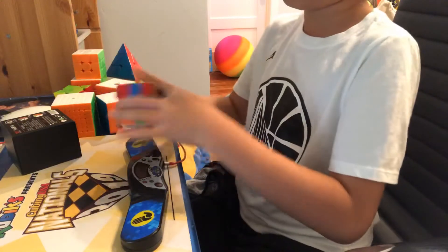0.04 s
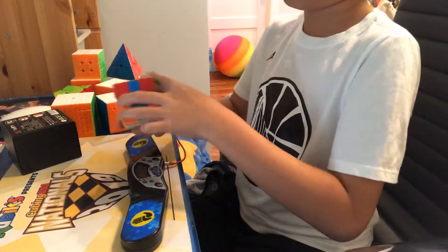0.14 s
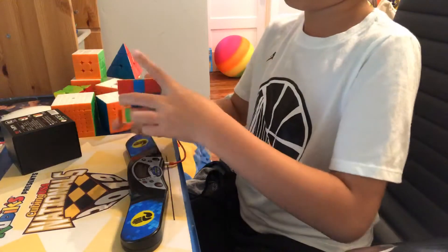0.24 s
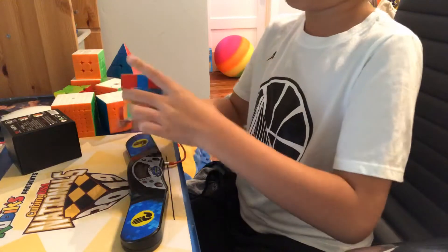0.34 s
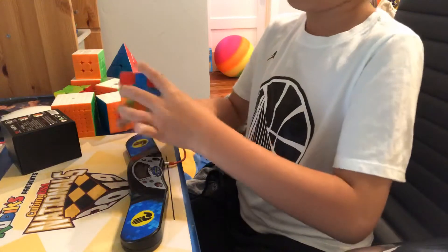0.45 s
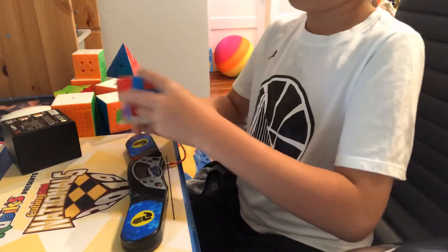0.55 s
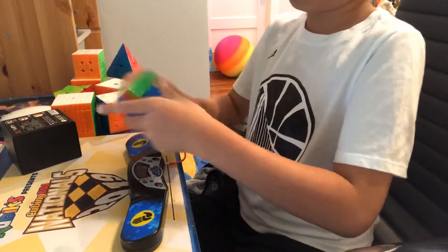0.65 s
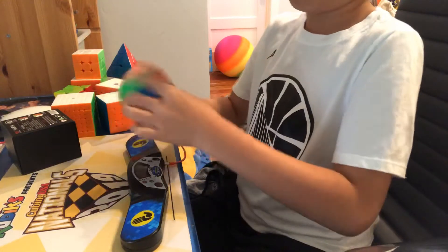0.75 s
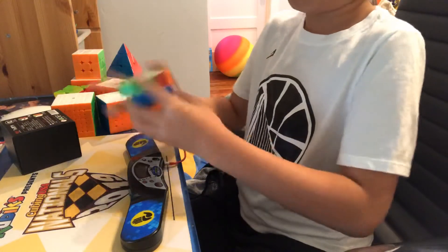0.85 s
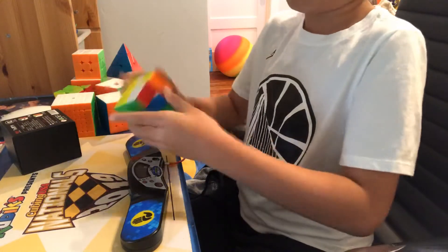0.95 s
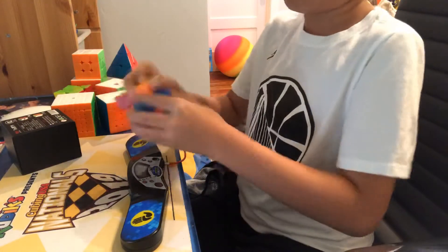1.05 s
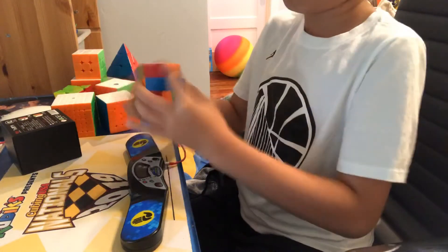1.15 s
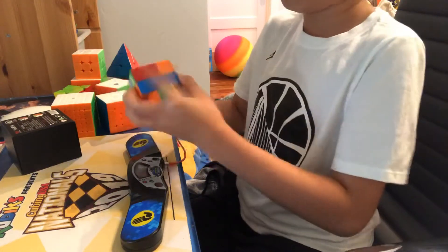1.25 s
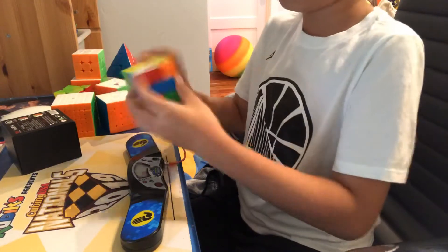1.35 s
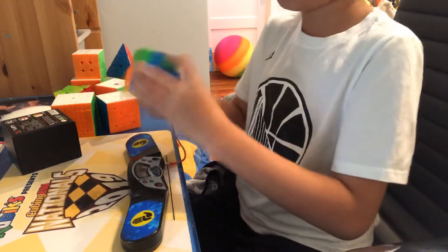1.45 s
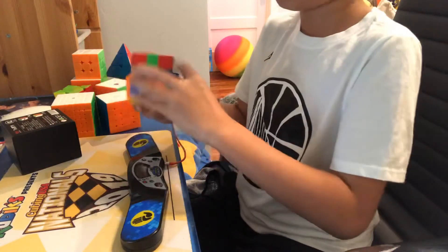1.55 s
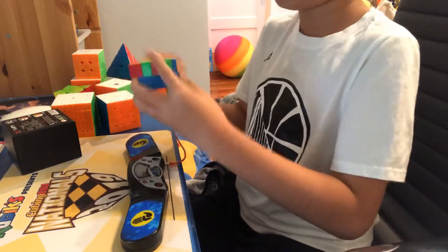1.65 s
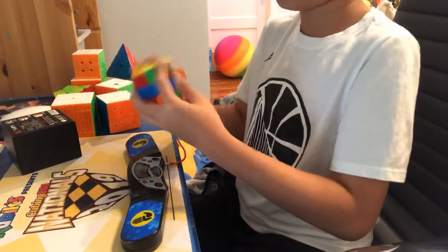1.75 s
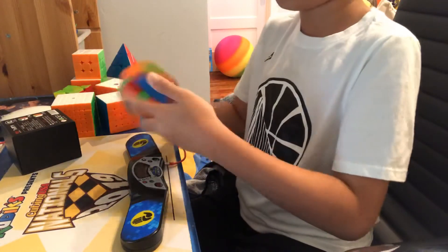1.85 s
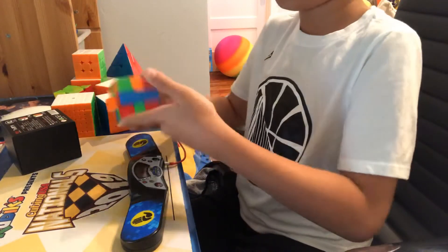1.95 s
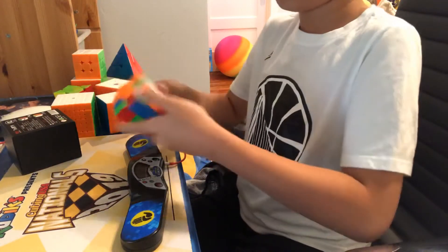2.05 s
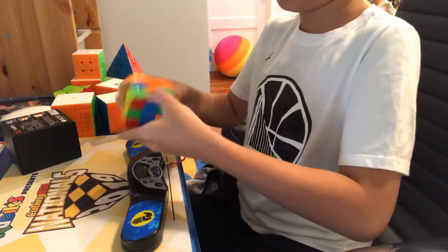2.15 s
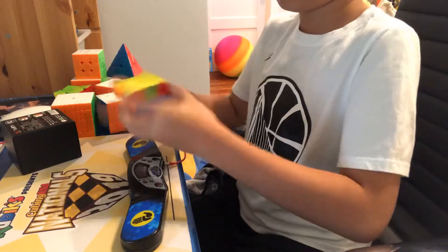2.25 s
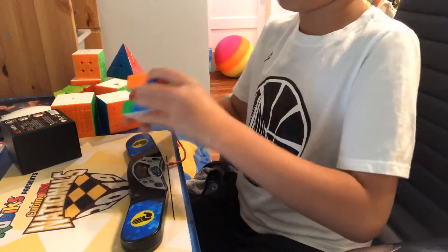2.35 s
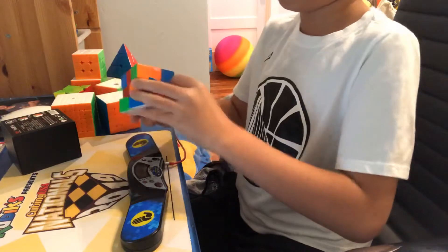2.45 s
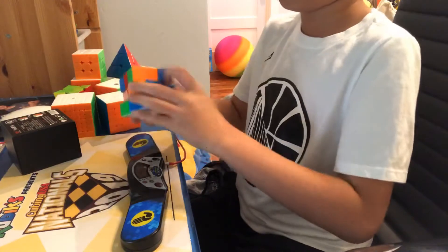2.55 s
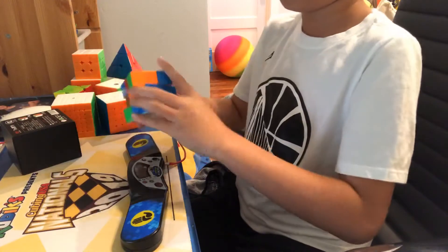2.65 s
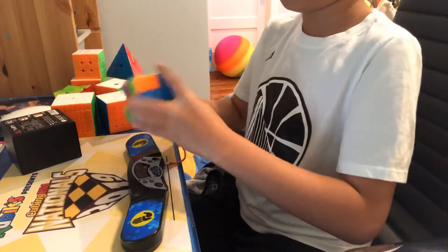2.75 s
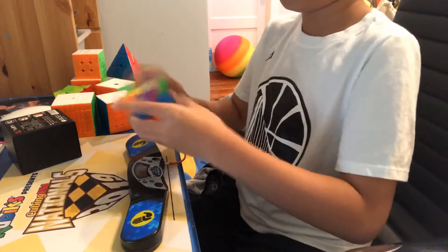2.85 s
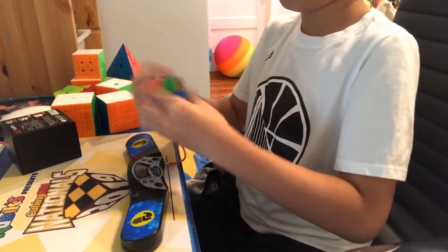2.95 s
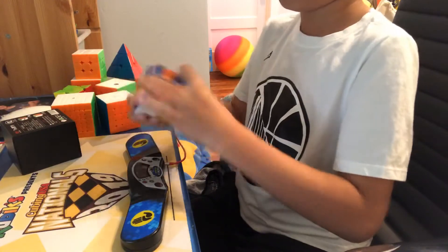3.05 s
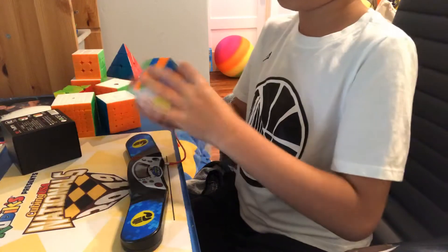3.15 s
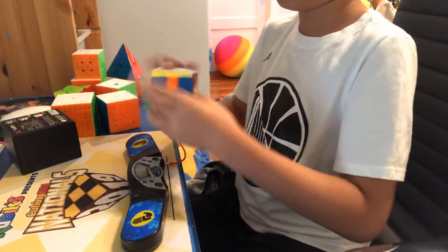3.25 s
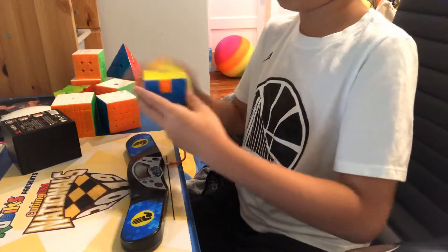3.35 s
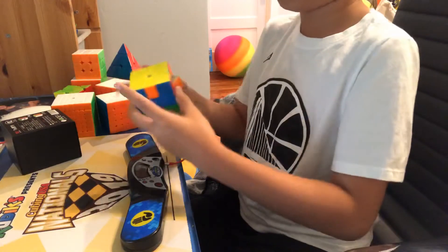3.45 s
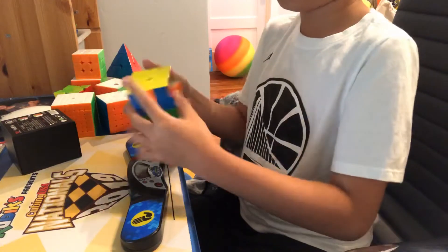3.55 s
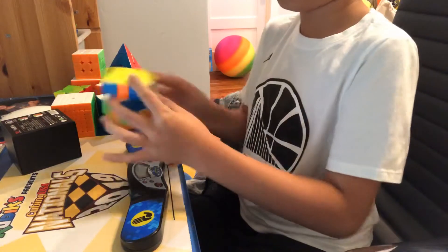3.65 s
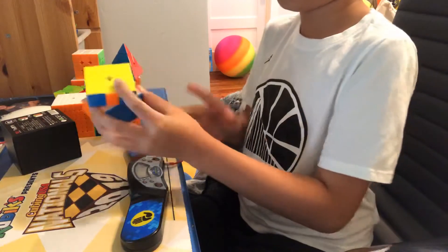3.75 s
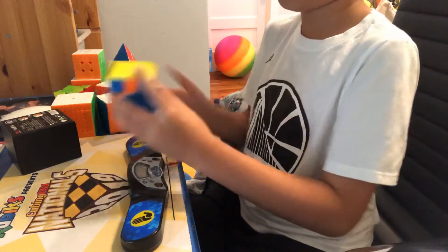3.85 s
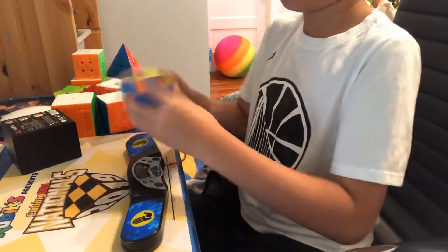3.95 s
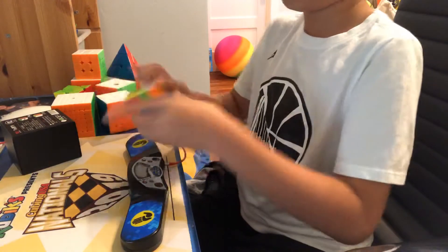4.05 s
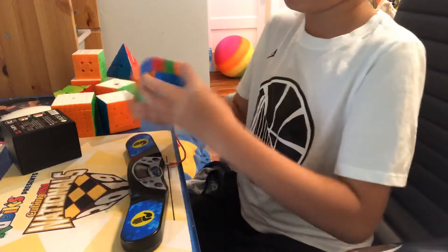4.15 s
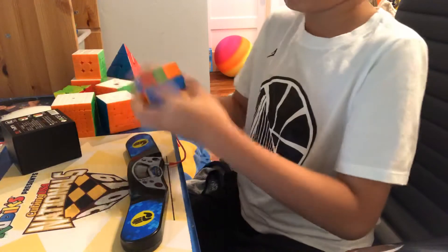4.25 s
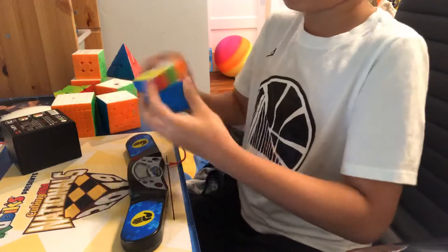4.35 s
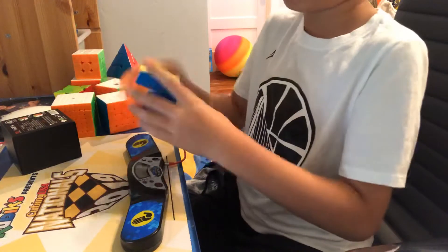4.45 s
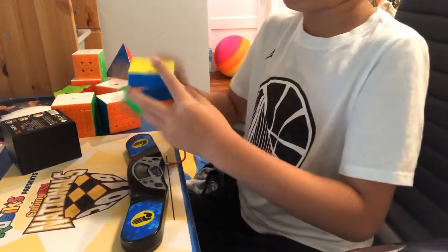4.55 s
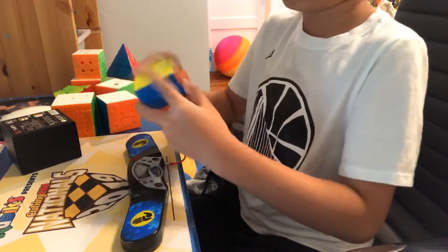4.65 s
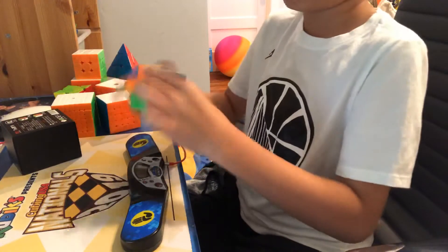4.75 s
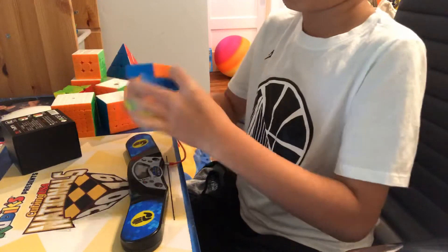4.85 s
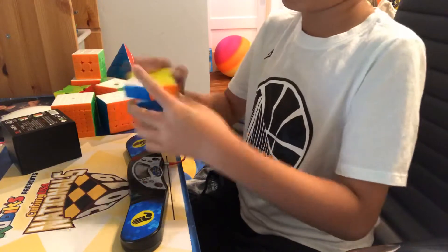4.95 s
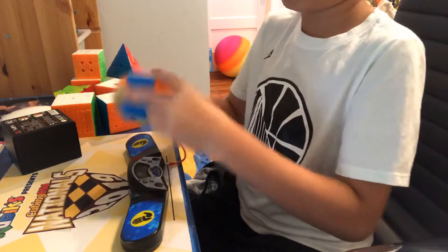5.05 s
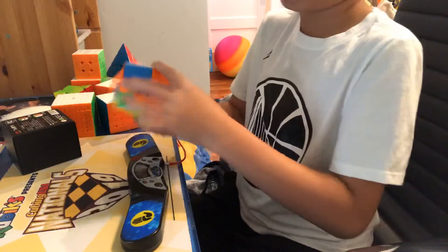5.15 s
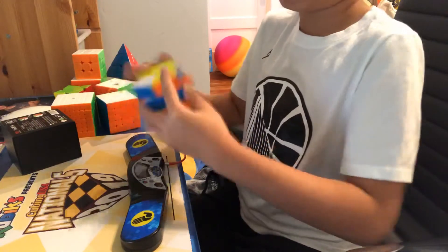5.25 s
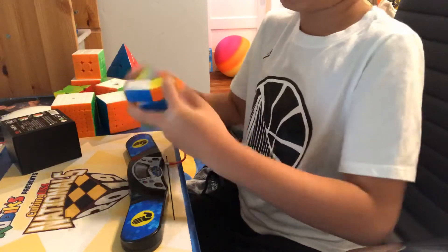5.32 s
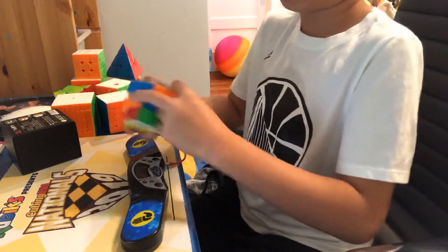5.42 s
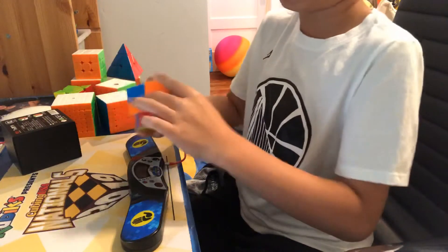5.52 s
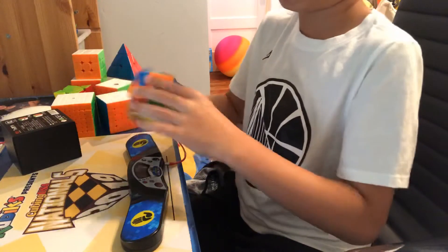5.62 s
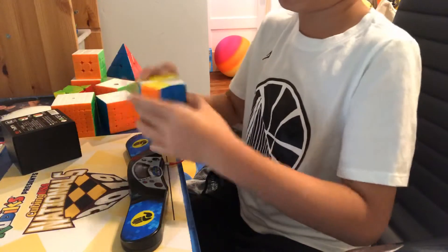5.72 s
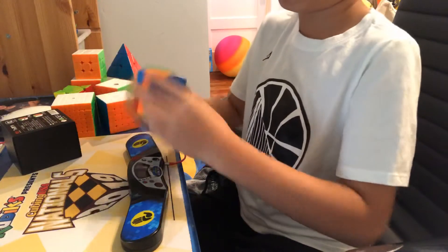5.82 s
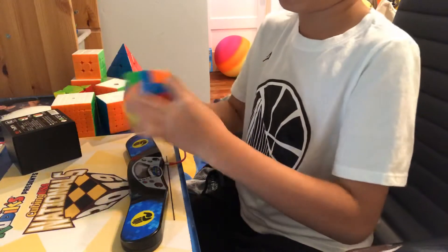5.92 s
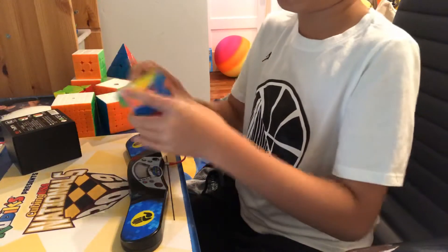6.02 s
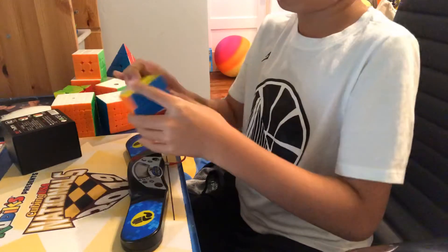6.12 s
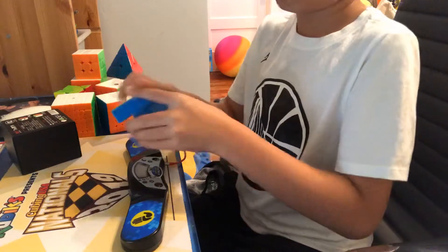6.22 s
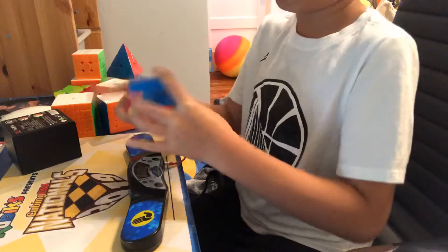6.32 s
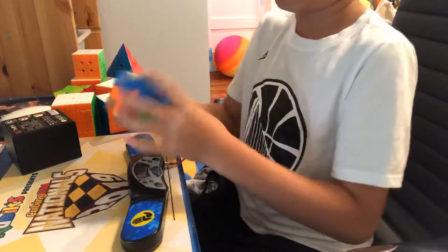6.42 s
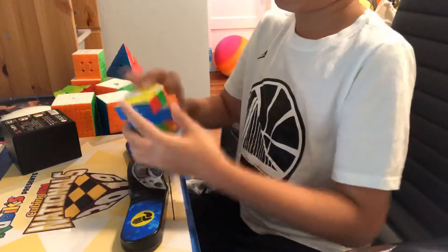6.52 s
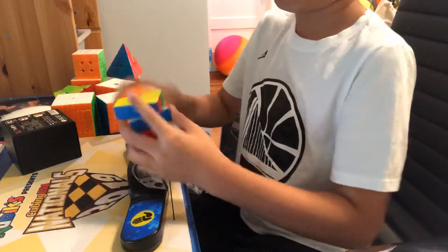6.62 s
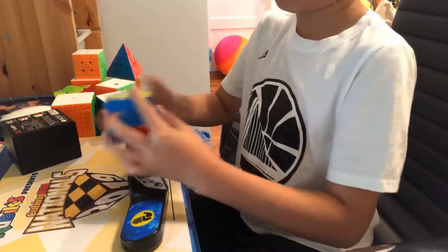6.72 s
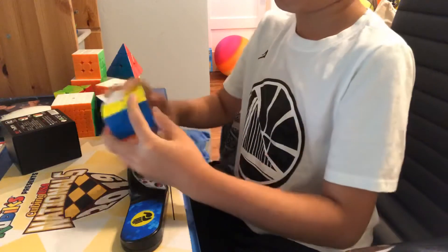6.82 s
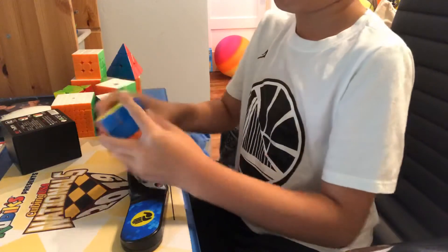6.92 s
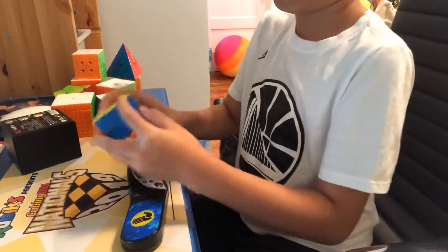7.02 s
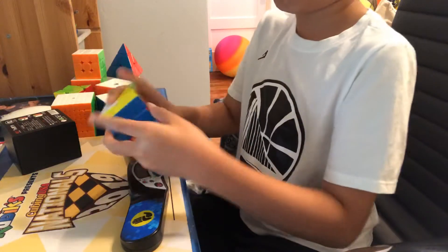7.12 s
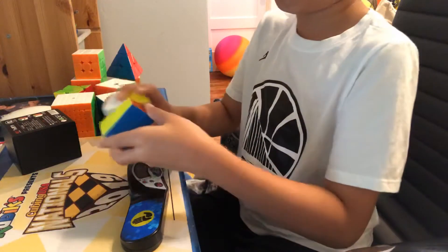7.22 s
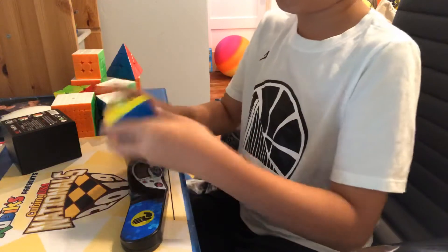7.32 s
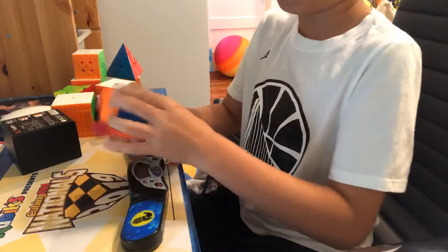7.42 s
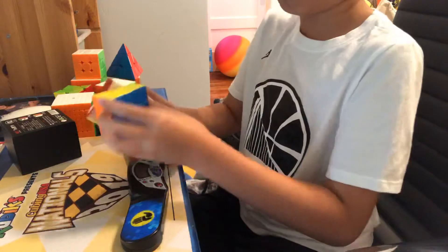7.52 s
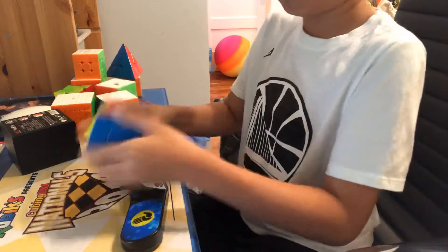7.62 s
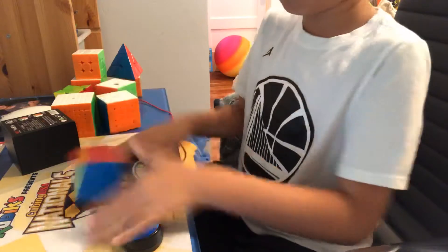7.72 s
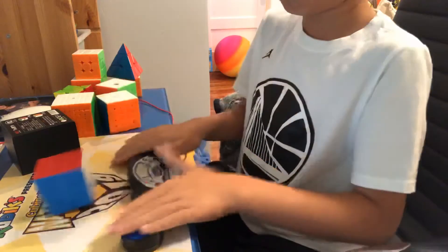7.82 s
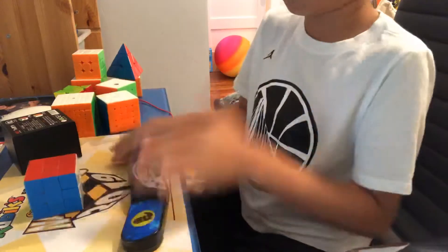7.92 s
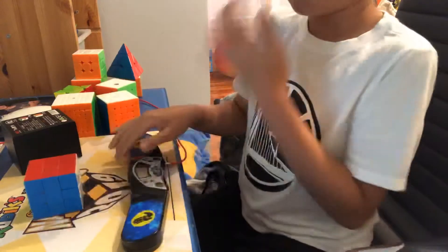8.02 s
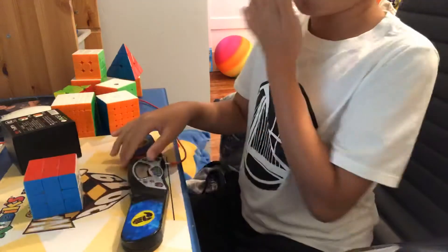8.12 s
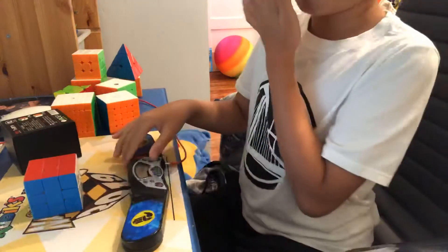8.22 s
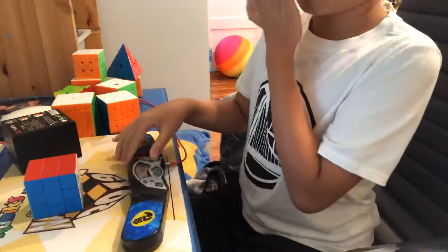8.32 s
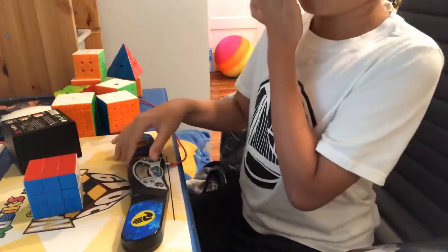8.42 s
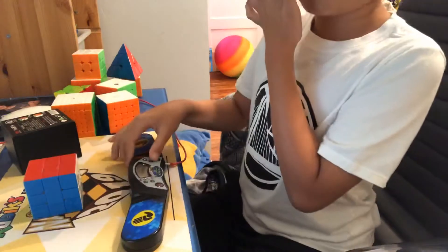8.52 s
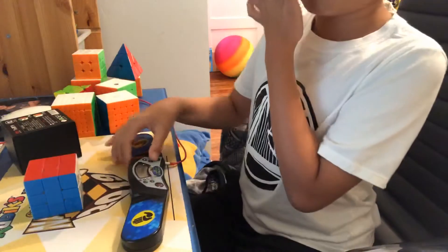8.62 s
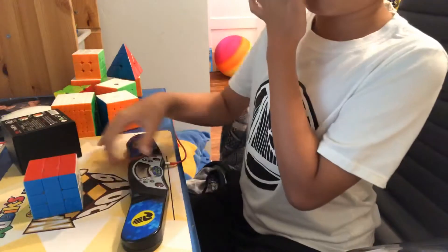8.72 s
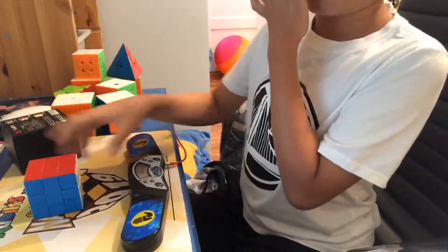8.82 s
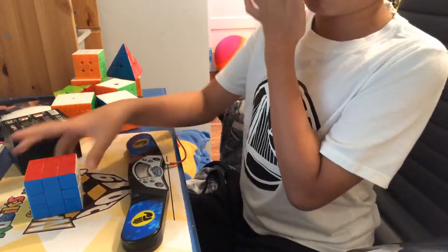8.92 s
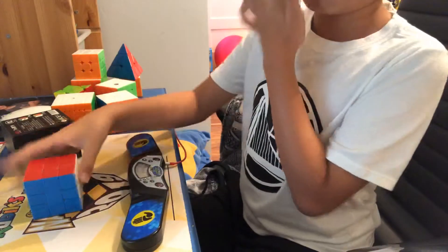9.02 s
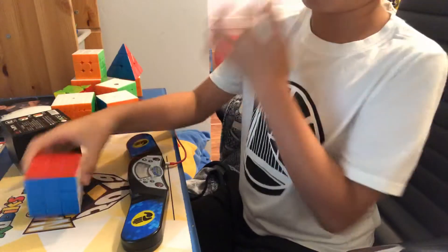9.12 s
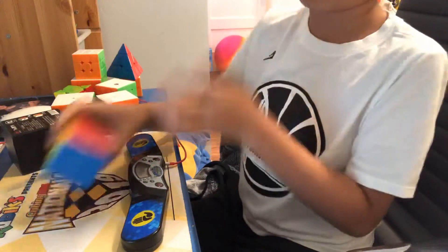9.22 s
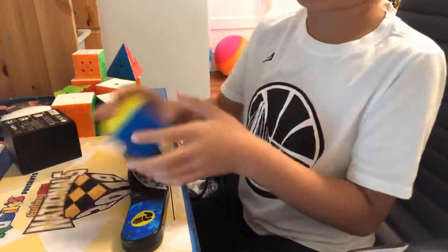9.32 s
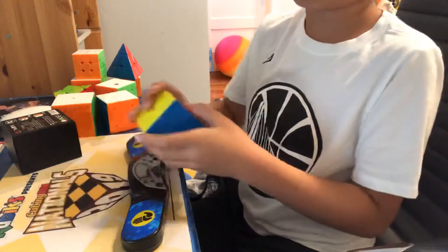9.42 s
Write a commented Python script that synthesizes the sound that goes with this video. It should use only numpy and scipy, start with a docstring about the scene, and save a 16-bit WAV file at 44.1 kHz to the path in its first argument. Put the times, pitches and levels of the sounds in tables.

```python
"""Turning a plastic twisty puzzle

Hands turn the puzzle fast in a small room while a low hum runs on. Each turn ticks and slides, and pieces snap
into place, ringing the plastic and the air in the hollow body. Near the end the puzzle drops on a desk mat and
thumps the desk top, then fingers lightly touch desk and puzzle and press the buttons of a timer."""
import sys
import numpy as np
from scipy import signal
from scipy.fft import rfft, irfft, next_fast_len
from scipy.io import wavfile
from scipy.ndimage import uniform_filter1d

SR = 44100
rng = np.random.default_rng(int(sys.argv[2]) if len(sys.argv) > 2 else 0)


def wav_out(sig):
    """Save sig, one row per channel (or a flat mono array), as 16-bit PCM at SR to the path in sys.argv[1]."""
    wavfile.write(sys.argv[1], SR, np.round(np.clip(np.atleast_2d(sig).T, -1, 1) * 32767).astype(np.int16))


N = 417627

# tone of the room air: (pitch [Hz], level [dB])
AIR_TONE = [(15, -65), (25, -35.5), (52, -13), (76, -8.5), (92, -19.5), (123, -4.5), (170, -23), (212, -19),
            (326, -22.5), (363, -28.5), (476, -25.5), (677, -36.5), (3430, -44), (16000, -54)]
# low hums: (pitch [Hz], width [Hz], level [dB])
HUMS = [(70, 16, -60), (122.3, 19.5, -58.5)]
# modes of the desk top, the notes it rings at: (pitch [Hz], level [dB], time to fade 60 dB [s])
DESK_MODES = [(65.4, -10.5, 0.42), (94.3, -6, 0.13), (147.8, -2.5, 0.12), (213, -9.5, 0.041),
              (322, 0.5, 0.049), (402, 6.5, 0.036), (478, -3.5, 0.11), (546, -17, 0.22), (686, -5, 0.091),
              (784, -11, 0.1), (950, 4.5, 0.017)]
# blows on the desk: (time [s], peak level [dB], contact time [ms])
DESK_BLOWS = [(7.803, -12.5, 1.15), (7.811, -22.5, 5.4), (7.819, -24, 1.4), (7.838, -21, 0.5),
              (7.933, -17, 0.93)]
# light touches and presses of timer buttons: (time [s], level [dB], knock pitch [Hz], knock level over the tick
# [dB])
FINGER_TOUCHES = [(7.933, -23.5, 950, -1), (8.3, -55, 870, -6), (8.5437, -46, 1230, 8.5),
                  (8.6832, -44.5, 1185, 5.5), (8.755, -46, 1350, -15), (8.792, -56.5, 996, 10),
                  (8.8, -62, 896, 14), (9.081, -60, 890, 13), (9.098, -45.5, 1550, -1.5),
                  (9.13, -56, 1144, -15), (9.179, -49.5, 810, -25), (9.197, -51, 810, -2),
                  (9.2058, -55, 790, 12), (9.213, -57, 900, 16), (9.4489, -35.5, 1170, -16)]
# modes of the pieces, damped by the fingers: (pitch [Hz], level [dB], time to fade 60 dB [s])
PIECE_MODES = [(2406, -4, 0.012), (2850, -11.5, 0.0072), (3660, -9, 0.0037), (4270, -0.5, 0.0055),
               (5040, -4.5, 0.0069), (5995, 0.5, 0.0069), (7195, 3.5, 0.0049), (8360, 1.5, 0.0027),
               (9780, -3.5, 0.0071), (11330, -4.5, 0.0071), (12870, -3, 0.0043), (14000, -8.5, 0.0027),
               (15500, -10, .002)]
# tone of sliding plastic: (pitch [Hz], level [dB])
SLIDE_TONE = [(290, -49.5), (500, -20), (906, -15), (1130, -6), (1620, 2), (1980, -10), (2290, -6),
              (7530, -9), (8450, -11.5), (12700, -18.5), (16000, -32.5)]
# flurries of turning between pauses: (start [s], length [s], level [dB])
TURN_FLURRIES = [(0.0, .11, -46), (0.264, .05, -52), (0.542, .34, -47), (1.0, .13, -49.5),
                 (1.153, .45, -43), (1.672, .16, -49.5), (2.02, .26, -73.5), (2.323, .07, -68),
                 (2.45, .05, -53), (2.76, .04, -56), (2.842, .11, -42), (3.032, .41, -44),
                 (3.54, .02, -55.5), (3.63, .14, -47), (4.012, .49, -45.5), (4.578, .08, -47),
                 (4.748, .17, -42.5), (4.998, .41, -42), (5.454, .12, -50), (5.778, .35, -41.5),
                 (6.196, .1, -56.5), (6.369, .31, -45), (6.753, .17, -47), (7.033, .08, -59),
                 (7.241, .06, -53.5), (7.35, .04, -62), (7.412, .15, -50), (7.646, .08, -42.5),
                 (7.802, .06, -57)]
# usual notes of the hollow body: (pitch [Hz])
HOLLOW_PITCHES = [1380, 1622, 1640, 1688, 1740]
# pieces snapping home, and near 7.8 s the puzzle clicking as it lands on the desk: (time [s], level [dB],
# hollow pitch [Hz], hollow level over the pieces [dB])
MAIN_SNAPS = [(0.0352, -21.5, 1650, -13.5), (0.0973, -34, 1630, -7), (0.2565, -28, 1610, -2),
              (0.3118, -27, 1430, -4), (0.369, -40.5, 1500, 2.5), (0.5263, -30.5, 1430, -6.5),
              (0.547, -27, 1480, -8), (0.5675, -21.5, 1340, -9), (0.6372, -26.5, 1770, -6.5),
              (0.687, -33, 1650, -3), (0.7111, -23.5, 1360, 0.5), (0.7184, -19, 1450, 2.5),
              (0.746, -22, 1390, 0.0), (0.8037, -29, 1550, 5), (0.8177, -24, 1410, -7),
              (0.8403, -25, 1700, 4.5), (0.856, -25.5, 1770, 1.5), (0.8695, -28.5, 1710, -14),
              (1.0052, -34, 1420, 3), (1.0293, -34.5, 1410, 6), (1.0758, -30.5, 1400, -3),
              (1.1539, -25.5, 1390, -5.5), (1.1837, -21.5, 1760, -3), (1.219, -22, 1620, -10),
              (1.2306, -24.5, 1560, -4.5), (1.2557, -22.5, 2010, -13.5), (1.264, -26.5, 1750, -20),
              (1.3192, -22, 1734, -14), (1.3723, -13, 2325, -7.5), (1.4545, -27, 1655, -1),
              (1.474, -25, 2070, -18), (1.49, -24, 1706, 4.5), (1.526, -17.5, 2090, -8),
              (1.5435, -25, 1760, 3), (1.5919, -30.5, 1760, 0), (1.703, -26, 1650, -8),
              (1.798, -27, 1610, -8), (1.8088, -26.5, 1740, -8), (1.9158, -53.5, 1400, 14.5),
              (2.121, -56.5, 1410, 11), (2.3718, -40, 1600, -5), (2.4421, -28, 1470, 4.5),
              (2.4741, -18.5, 1470, -5.5), (2.635, -54, 1370, 13), (2.7573, -39, 1600, -2.5),
              (2.82, -28.5, 1460, -0.5), (2.897, -21.5, 1614, -14), (2.9206, -23, 1460, -5.5),
              (3.013, -28, 1650, -8), (3.0421, -24.5, 1690, -2.5), (3.0798, -17.5, 1770, -7.5),
              (3.1451, -17, 1810, -15), (3.18, -25.5, 1287, -14), (3.2308, -27.5, 1280, -6),
              (3.2824, -30.5, 1820, 2.5), (3.3118, -12.5, 1700, -12.5), (3.3218, -20, 1640, 1.5),
              (3.3679, -25, 1970, -15), (3.3928, -24, 1740, -4.5), (3.4114, -25, 1860, -7),
              (3.59, -40.5, 1230, -14), (3.6438, -30, 1580, -22), (3.6696, -23, 1680, -6),
              (3.7303, -20.5, 1370, -10), (3.744, -14, 1570, -7), (3.9877, -30.5, 1440, -5),
              (4.0015, -26, 1390, 2.5), (4.011, -28.0, 1700, -1), (4.0774, -22.5, 1750, -10),
              (4.1095, -25, 1414, -2), (4.1743, -45.5, 1680, 12), (4.191, -19, 2066, -9.5),
              (4.2192, -19.5, 1720, -3.5), (4.245, -14.5, 1590, -10), (4.3602, -31.5, 1605, -3.5),
              (4.417, -19.5, 1650, 0.5), (4.491, -30.5, 2180, -3.5), (4.5599, -27.5, 1520, -5.5),
              (4.6183, -21.5, 1380, -9), (4.6344, -15, 1640, -11), (4.7484, -31, 1520, 0),
              (4.7631, -27.5, 1703, -4), (4.8474, -35.5, 1573, 4), (4.8593, -18.5, 1736, -1),
              (4.99, -28.5, 1660, -6.5), (5.01, -29, 1380, -4.5), (5.0331, -23, 1590, -11),
              (5.0401, -12, 1580, -8), (5.054, -16, 1132, -18.5), (5.1012, -31.5, 1584, 6),
              (5.1245, -30, 1590, -0.5), (5.1755, -9.5, 1620, -4), (5.2097, -23, 1406, -14),
              (5.306, -22.5, 1670, -14), (5.3362, -10, 1652, -17), (5.3727, -19.5, 1490, -13),
              (5.386, -24.5, 1870, -9), (5.461, -26.5, 2160, -1.5), (5.4813, -31.5, 1650, 8.5),
              (5.4937, -23.5, 1370, -10.5), (5.5732, -27.5, 1956, -12), (5.65, -48.5, 1580, 1),
              (5.681, -48.5, 1590, -1), (5.7408, -40.5, 1570, 5.5), (5.7544, -32.5, 1640, -4.5),
              (5.7843, -42.5, 1684, 15), (5.791, -35.5, 1640, 1.5), (5.8336, -25.5, 1577, -16),
              (5.8488, -27.5, 1630, -7.5), (5.906, -26, 1620, 1), (5.916, -25, 1680, -3.5),
              (5.9441, -10.5, 1670, -6), (6.0666, -28, 1590, -7), (6.093, -25, 1490, -14),
              (6.11, -28, 1190, -2), (6.132, -35, 1110, 2.5), (6.242, -40.5, 1540, -12.5),
              (6.3447, -45, 1590, 15.5), (6.3657, -30, 1580, -2), (6.4062, -48.5, 1580, 14.5),
              (6.4142, -26.5, 1650, -2.5), (6.4801, -26.5, 1980, -6), (6.4976, -24.5, 1640, -1),
              (6.583, -31.5, 2020, 4.5), (6.613, -14.5, 1620, -5.5), (6.775, -29.5, 1120, 3),
              (6.854, -28, 1640, 0), (6.893, -27.5, 1280, -5), (6.902, -18.5, 1610, -8),
              (7.0255, -30.5, 1710, -8), (7.0343, -25.5, 1583, -2.5), (7.1535, -42.5, 1644, -2.5),
              (7.2731, -32.5, 1664, 0.5), (7.282, -31.5, 1668, -12), (7.4036, -23, 1690, -1),
              (7.414, -23.5, 1600, 0), (7.4688, -34.5, 1610, 7.5), (7.4872, -22.5, 1740, 5.5),
              (7.5255, -20, 1610, -9), (7.5527, -24, 1460, -6.5), (7.6629, -28.5, 1730, 1.5),
              (7.7165, -31.5, 1860, -1), (7.787, -26, 1610, 8), (7.8036, -13.5, 1490, -2.5),
              (7.8105, -22, 1430, 5.5), (7.8188, -24, 1650, 6), (7.8355, -24, 1380, -1.5)]

RING_SAMPLES = 1024
ROOM_FADE_S, ROOM_TREBLE_FADE_S, ROOM_DB = 0.34, 0.16, -6.5  # a fade is a drop of 60 dB
RISE_DB_PER_S, FALL_DB_PER_S = 451, 173.5  # edges of a flurry
RATTLE_DB, RATTLE_S = -25, 0.039  # loose pieces after a snap: relative level, time to fall to 37%
TICKS_PER_S = 180


def gain(db):
    """Turn decibels into a factor to multiply by."""
    return 10 ** (np.asarray(db) / 20)


def set_level(x, db):
    """Scale a sound to an average (rms) level."""
    return x * gain(db) / np.sqrt(np.mean(x ** 2))


def shape_tone(x, points):
    """Filter a sound along a curve of (pitch [Hz], level [dB]) points."""
    hz, db = np.transpose(points)
    size = next_fast_len(len(x))
    bin_hz = np.maximum(np.arange(size // 2 + 1) * SR / size, 1)
    curve = gain(np.interp(np.log(bin_hz), np.log(hz), db))
    return irfft(rfft(x, size) * curve, size)[:len(x)]


def cut_bass(x, hz):
    """An object gives off little sound at pitches too low for its size."""
    return signal.sosfilt(signal.butter(6, hz, "high", fs=SR, output="sos"), x)


def place(times, sounds):
    """Add each sound to a silent track at its time in seconds."""
    track = np.zeros(N + sounds.shape[1])
    for time, sound in zip(times, sounds):
        start = int(time * SR)
        track[start:start + len(sound)] += sound
    return track[:N]


def ring(hz, db, fade_s, size=RING_SAMPLES):
    """A struck object rings as a sum of fading sine waves; one row per hit."""
    t = np.arange(size)[:, None] / SR
    hz, db, fade_s = (np.asarray(v)[:, None, :] for v in np.broadcast_arrays(hz, db, fade_s))
    return np.sum(gain(db - 60 * t / fade_s) * np.sin(2 * np.pi * hz * t), axis=2)


def strike(rings, rise_ms, fall_ms, peak_db):
    """A rough burst of contacts drives each ring; its loudest 2 ms set the level."""
    ms = np.arange(rings.shape[1]) * 1000 / SR
    envelope = (1 - np.exp(-(ms / rise_ms) ** 2)) * np.exp(-ms / fall_ms)
    force = envelope * rng.standard_normal(rings.shape)
    hits = signal.fftconvolve(force, rings, axes=1)[:, :rings.shape[1]]
    peak_power = uniform_filter1d(2 * hits ** 2, size=96, axis=1).max(axis=1)
    return hits * (gain(peak_db) / np.sqrt(peak_power))[:, None]


def background():
    """Steady room air, plus two wavering hums made of narrow bands of noise."""
    sound = set_level(shape_tone(rng.standard_normal(N), AIR_TONE), -56.5)
    for hz, width, db in HUMS:
        b, a = signal.iirpeak(hz, hz / width, fs=SR)
        band = signal.lfilter(b, a, rng.standard_normal(N))
        sound += set_level(signal.lfilter(b, a, band), db)
    return sound


def room_echo(x):
    """The room's echo builds over a few milliseconds and loses its treble first."""
    t = np.arange(SR // 2) / SR
    filters = (signal.butter(1, 4000, kind, fs=SR, output="sos") for kind in ("low", "high"))
    low, high = (signal.sosfilt(sos, rng.standard_normal(len(t))) for sos in filters)
    tail = low * gain(-60 * t / ROOM_FADE_S) + 2.33 * high * gain(-60 * t / ROOM_TREBLE_FADE_S)
    tail *= 1 - np.exp(-(t / 0.0049) ** 2)
    return signal.fftconvolve(x, tail / np.sqrt(np.sum(tail ** 2)))[:N] * gain(ROOM_DB)


def desk_thumps():
    """The mat softens each blow into a smooth push that rings the desk top."""
    times, db, contact_ms = np.transpose(DESK_BLOWS)
    hz, mode_db, fade_s = np.transpose(DESK_MODES)
    rings = ring(hz[None], mode_db, fade_s, size=16 * RING_SAMPLES)
    ms = np.arange(RING_SAMPLES) * 1000 / SR
    push = np.sin(np.pi * np.clip(ms / contact_ms[:, None], 0, 1))
    thumps = signal.fftconvolve(push, rings, axes=1)
    thumps *= (gain(db) / np.abs(thumps).max(axis=1))[:, None]
    return cut_bass(place(times, thumps), hz=59)


def plastic_rings(hardness_db, scatter_db, detune):
    """Each hit lands on a new spot and favours other modes; harder hits crack more."""
    hz, db, fade_s = np.transpose(PIECE_MODES)
    chance = rng.standard_normal((len(hardness_db), 2, len(hz)))
    rings = ring(hz * (1 + detune * chance[:, 0]), db + scatter_db * chance[:, 1], fade_s)
    crack = np.outer(gain(15.5 + hardness_db), signal.unit_impulse(RING_SAMPLES))
    return rings + crack


def finger_touches():
    """Fingers tick on hard plastic, touching or pressing timer buttons, with a short dull knock."""
    times, db, hz, knock_db = np.transpose(FINGER_TOUCHES)
    plastic = plastic_rings(np.zeros(len(times)), scatter_db=0.6, detune=0.061)
    ticks = strike(plastic, rise_ms=0.3, fall_ms=3.9, peak_db=db - 3.5)
    body = ring(np.outer(hz, [1, 0.78, 1.3]), db=[0, -1.5, -9], fade_s=[0.018, 0.016, 0.01])
    knocks = strike(body, rise_ms=0.96, fall_ms=2.05, peak_db=db + knock_db - 0.7)
    return cut_bass(place(times, ticks + knocks), hz=690)


def flurry_db(t):
    """Loudness of the turning: each flurry rises fast, holds and dies away."""
    start, length, db = np.transpose(TURN_FLURRIES)[:, :, None]
    before, after = np.maximum(start - t, 0), np.maximum(t - start - length, 0)
    return np.max(db - RISE_DB_PER_S * before - FALL_DB_PER_S * after, axis=0)


def turning():
    """Turning layers tick and hiss in flurries; loose pieces rattle on after each main snap."""
    t = np.arange(N) / SR
    flurry_power = np.interp(t, t[::64], gain(flurry_db(t[::64])) ** 2)
    snap_times, snap_db = np.transpose(MAIN_SNAPS)[:2]
    jolts = place(snap_times, gain(snap_db + RATTLE_DB)[:, None] ** 2)
    rattle_power = signal.lfilter([1], [1, -np.exp(-2 / (RATTLE_S * SR))], jolts)
    tick_starts = rng.random(N) < TICKS_PER_S / SR
    tick_sizes = gain(3.8 * np.minimum(rng.exponential(size=N), 3.5))
    tick_fade = np.exp(-np.arange(400) / (0.0033 * SR))
    ticks = signal.fftconvolve(tick_starts * tick_sizes, tick_fade)[:N] * rng.standard_normal(N)
    hiss = set_level(rng.standard_normal(N), -22)
    rubbing = shape_tone(set_level(ticks, -2.5) + hiss, SLIDE_TONE)
    return np.sqrt(flurry_power + rattle_power) * set_level(rubbing, 0.67)


def small_snap_table(count):
    """Rows like MAIN_SNAPS for small snaps spread over the flurries, louder in louder turning."""
    offset, pitch_choice, strength = rng.random((count, 3)).T
    start, length, db = np.transpose(TURN_FLURRIES)
    ends = np.cumsum(length)  # on a clock that stops during the pauses
    turning_time = (np.arange(count) + offset) / count * ends[-1]
    flurry = np.searchsorted(ends, turning_time)
    times = np.maximum((start + length - ends)[flurry] + turning_time, 0.003)
    peak_db = db[flurry] + 11 - 3 * np.log(1 - 0.9 * strength)
    hollow_db = rng.normal(-6, 6.5, count)
    hz = np.array(HOLLOW_PITCHES)[(pitch_choice * len(HOLLOW_PITCHES)).astype(int)]
    return np.transpose([times, peak_db, hz, hollow_db])


def snaps(table):
    """A snap rings the pieces and the air inside the puzzle, and knocks faintly in the hands."""
    times, db, hz, hollow_db = np.transpose(table)
    plastic = plastic_rings(hardness_db=0.3 * (db + 20.5), scatter_db=2.1, detune=0.068)
    fall_ms = 3.5 - 0.04 * (db[:, None] + 21)  # louder snaps are shorter
    pieces = strike(plastic, rise_ms=0.83, fall_ms=fall_ms, peak_db=db - 0.6)
    # the hollow has two close notes, whose pitch depends on how far the layers stand open
    air = ring(np.outer(hz, [1, 1.2]), db=[0, -8], fade_s=[0.017, 0.012])
    hollow = strike(air, rise_ms=0.72, fall_ms=1.7, peak_db=db + hollow_db - 0.6)
    palms = ring(np.tile([390, 560], (len(times), 1)), db=[0, -2], fade_s=0.03)
    knocks = strike(palms, rise_ms=2.2, fall_ms=1.7, peak_db=db - 30.5)
    # the layer scrapes ever harder until it snaps home
    swell = np.exp(np.arange(-RING_SAMPLES, 0) / (0.011 * SR))
    scrapes = swell * rng.standard_normal((len(times), RING_SAMPLES)) * gain(db - 16)[:, None]
    scraping = shape_tone(np.roll(place(times, scrapes), -RING_SAMPLES), SLIDE_TONE)
    # contact starts about 2 ms before the loudest moment
    clicks = place(times - 0.0022, cut_bass(pieces, hz=2470) + hollow)
    return cut_bass(clicks, hz=1008) + place(times - 0.002, knocks) + scraping


def scene():
    """Puzzle, desk, room echo and background, mixed into one channel."""
    handling = turning() + snaps(small_snap_table(count=70)) + desk_thumps()
    # three sides of the room each get the main snaps and touches from another angle, in another tone
    echoes = sum(room_echo(snaps(MAIN_SNAPS) + finger_touches() + handling) for _ in range(3))
    direct = snaps(MAIN_SNAPS) + finger_touches() + handling
    return (direct + echoes / np.sqrt(3) + background())[None]


def record(dry):
    """Cut the highest treble, above 15900 Hz."""
    return signal.sosfilt(signal.ellip(8, 0.2, 70, 15900, fs=SR, output="sos"), dry)


dry = scene()
out = record(dry)
wav_out(out)
```